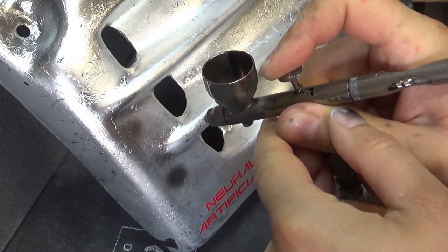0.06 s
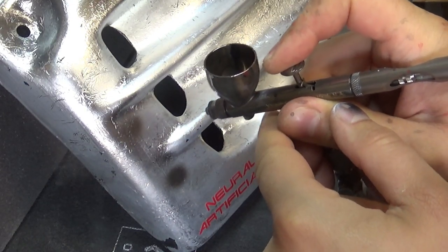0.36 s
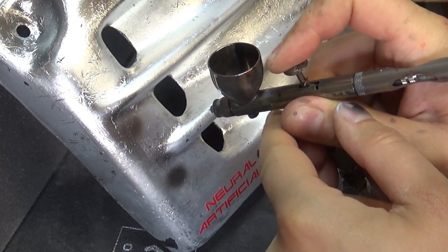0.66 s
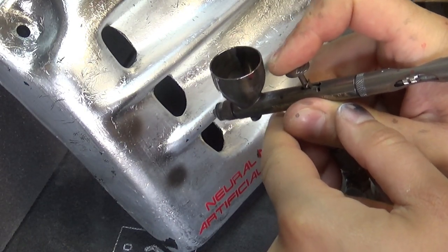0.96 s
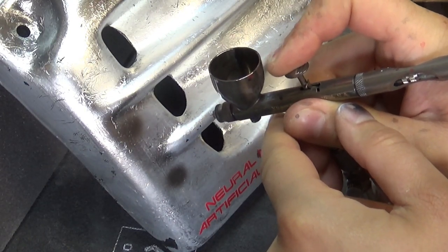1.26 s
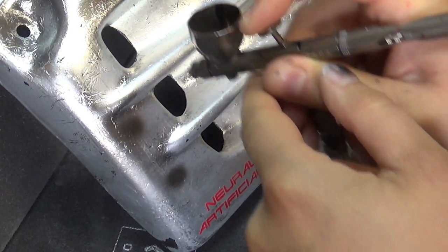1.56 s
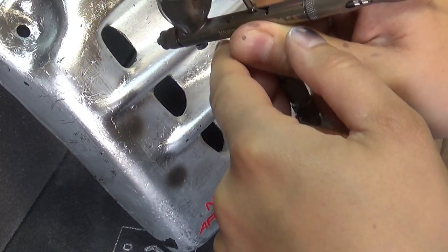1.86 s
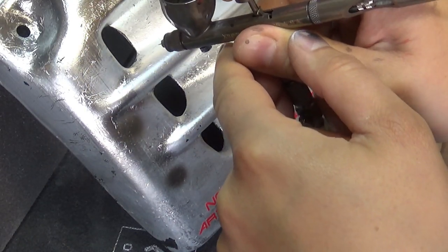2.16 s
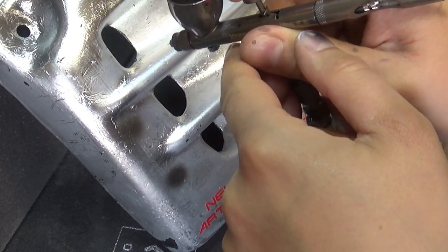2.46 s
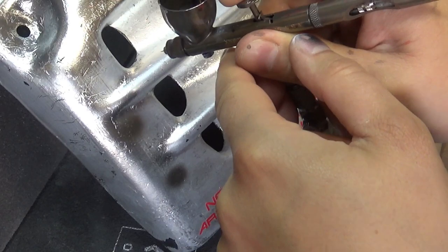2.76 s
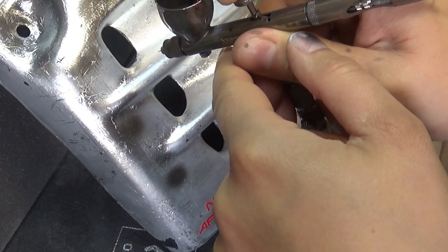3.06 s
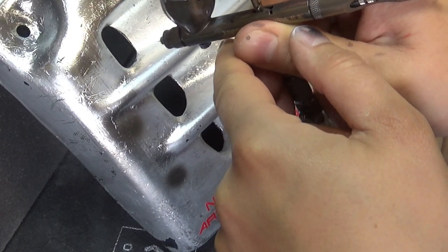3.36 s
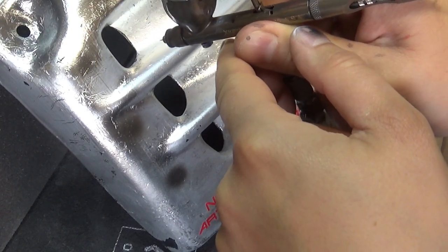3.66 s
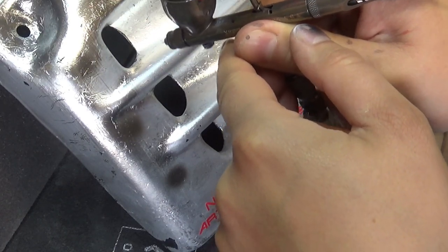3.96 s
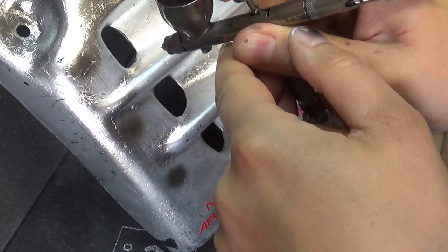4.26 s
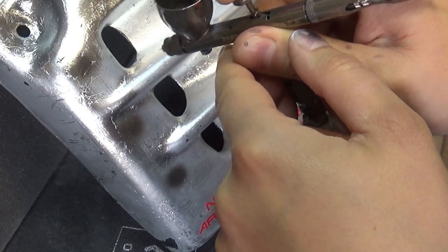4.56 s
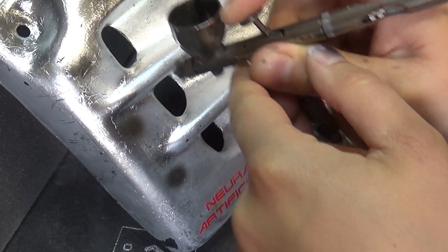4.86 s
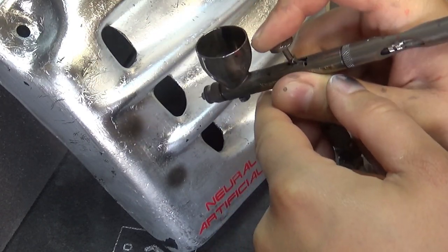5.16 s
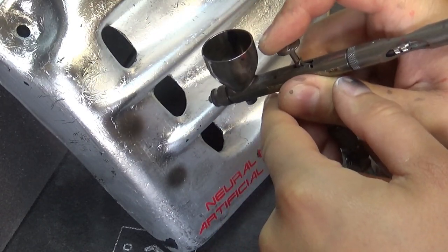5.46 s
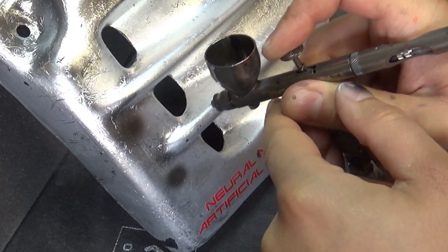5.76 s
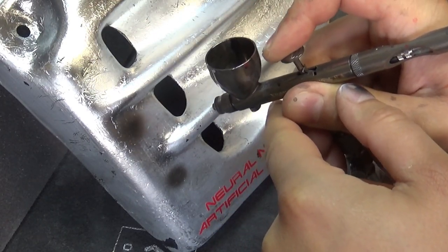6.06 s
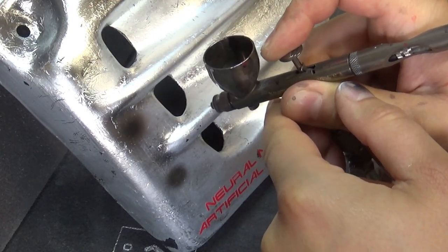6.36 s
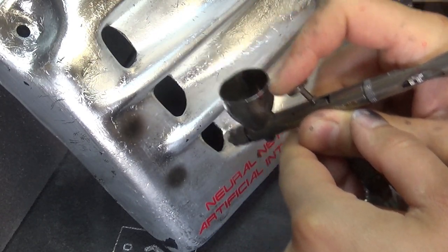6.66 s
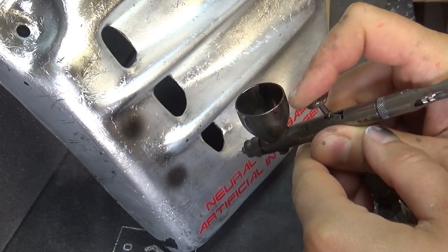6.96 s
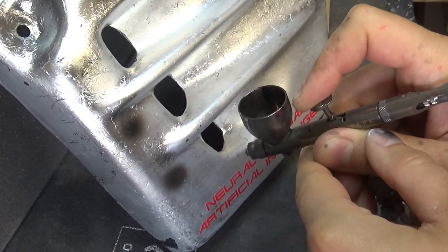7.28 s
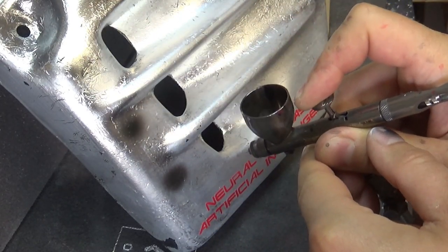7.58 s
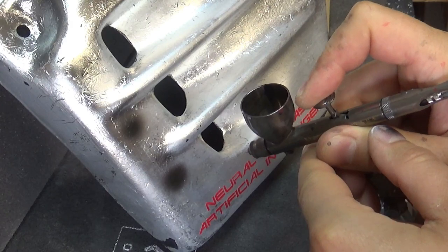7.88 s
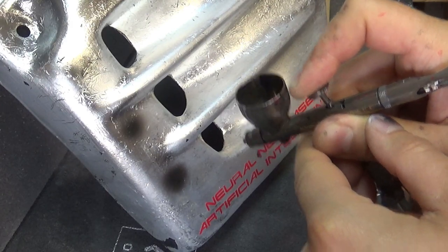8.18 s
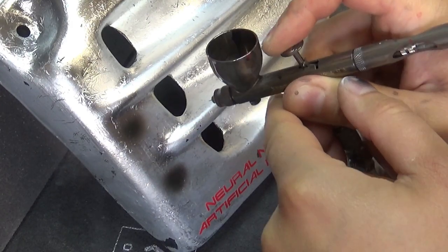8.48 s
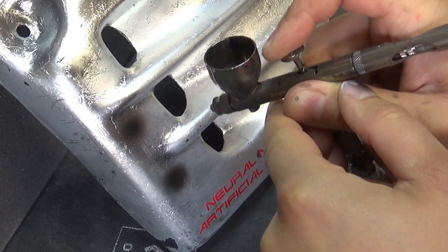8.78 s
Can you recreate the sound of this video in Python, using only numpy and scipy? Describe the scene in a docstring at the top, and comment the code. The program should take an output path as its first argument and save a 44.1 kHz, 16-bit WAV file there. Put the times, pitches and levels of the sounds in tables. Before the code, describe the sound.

Close, bright hiss of an airbrush blowing continuously on sheet metal, with soft gusts of air and a low extractor fan behind.

```python
"""Airbrush on a metal panel

An airbrush blows steadily at a pressed metal panel, close up in a small workshop. The nozzle hisses,
the jet splashes on the sheet and rushes in gusts over its ribs and holes. As the hands move, the gap
between hand and panel recolours the hiss. An extractor fan drones behind."""
import sys
import numpy as np
from scipy import signal
from scipy.io import wavfile
from scipy.ndimage import uniform_filter1d

SR = 44100
rng = np.random.default_rng(int(sys.argv[2]) if len(sys.argv) > 2 else 0)


def persist_wave(psi):
    """Save psi, clipped to +-1, as 16-bit WAV."""
    counts = np.round(np.clip(psi, -1, 1) * 32767).astype(np.int16)
    wavfile.write(sys.argv[1], SR, np.atleast_2d(counts).T)


N = 397782

# tone of each layer: f/Hz, level/dB
FAN_TONE = [(20, -24), (90, -14.5), (180, -14), (260, -9), (380, -11.5), (490, 0.5), (590, -1.5), (720, -7),
            (850, -13.5), (2000, -52)]
BUFFET_TONE = [(80, -47), (180, -14.5), (250, -4.5), (350, 2), (430, 0.5), (560, -2.5), (750, -15),
               (1500, -46)]
RUSH_TONE = [(100, -11), (400, -3.5), (800, -0.5), (1100, 0), (1400, -0.5), (1950, 1), (2300, -6),
             (3500, -52)]
SPRAY_TONE = [(8000, -31), (10500, 0.5), (11400, 3), (13000, -2), (14400, -3.5), (15700, -5.5)]
SPLASH_TONE = [(600, -25), (1600, -12.5), (2100, -8), (2950, -3.5), (3400, -2), (5000, 0), (7500, 3),
               (10000, 0.5), (15000, -29)]
NOZZLE_TONE = [(6500, -26), (7450, -13.5), (7950, -1), (8900, 2.5), (10000, -2.5), (10700, -8),
               (12000, -31.5), (15000, -40)]
# ring of the fan duct and bench: f/Hz, width/Hz, gain/dB
DUCT_MODES = [(33, 9, 0), (59, 8.3, -1), (124, 28, 7), (260, 12, 3), (278, 24, -1), (352, 18, 3.5),
              (374, 18, 0), (400, 26, 3.5), (438, 22, -1.5), (499, 56, 3.5), (586, 30, 2), (690, 21, -7),
              (722, 33, 5), (920, 72, 2.5), (1084, 61, 5), (1236, 30, 4.5), (1464, 27, 4.5)]
# stereo width: f/Hz, side minus mid/dB
STEREO_WIDTH = [(60, -29), (170, -18), (340, -25), (540, -20), (750, -10), (1300, -19.5), (2400, -11),
                (3300, -22), (4400, -14), (5200, -11.5), (6400, -7.5), (9300, -27.5), (11000, -11.5),
                (13300, -59)]
# nozzle heights: low (-1, near the lower edge), middle (0), raised (1, hand cupped behind it)
HEIGHTS = [-1, 0, 1]
# peaks and hollows between hand and sheet: f/Hz, width/Hz, gain/dB at low, middle, raised
GAP_MODES = [(1980, 230, 0.5, 2, -1), (2370, 490, -0.5, -1.5, -4), (2664, 110, -5, -8.5, -2),
             (3060, 300, -1, -2, 1), (3325, 180, 2.5, 5.5, 2.5), (3695, 230, 6, 4.5, 0),
             (4400, 640, 6.5, 5, 1), (4980, 380, 2.5, 2, -1.5), (5770, 750, 2.5, 3.5, 4),
             (6370, 300, -5.5, -1, -1.5), (6780, 350, 0, 1, 4.5), (7550, 350, 0, 0.2, 2),
             (7900, 210, 2.5, 4, 0), (8470, 450, 4.5, 3.5, 2.5), (9190, 370, 4, 1, -2.5),
             (9670, 600, 7, 4, 1), (10120, 240, 1, 4.5, 0), (10470, 450, 6, -1.5, -1.5),
             (11600, 410, 0.5, -5, 0.5), (14350, 600, 1, 1, -1), (15050, 800, 1, -1, -5)]
# notch cut by the sheet's reflection: f/Hz at low, middle, raised
NOTCH_HZ = [7040, 6680, 6080]
# fader of each air layer: level/dB at low, middle, raised (flow at 0 dB), dB gained per dB of flow
BUFFET_LEVEL = (-49, -48.5, -48, 0.4)
RUSH_LEVEL = (-51, -48.5, -46, -0.1)
SPRAY_LEVEL = (-33.5, -36.5, -33, 1)
SPLASH_LEVEL = (-35, -33.5, -34, 0.72)
NOZZLE_LEVEL = (-27, -25.5, -28.5, 1.14)
# the jet catches a rib or a hole: peak t/s, length/s, buffet level/dB, rush level/dB
GUSTS = [(.1, 0.11, -47.5, -50), (.5, .2, -48, -50), (1.76, 0.089, -45, -62), (1.873, 0.13, -43.5, -44),
         (2.218, 0.13, -43, -56), (2.647, .16, -45, -58), (2.96, .1, -42, -46), (3.38, 0.16, -41.5, -47.5),
         (3.755, 0.17, -43, -52), (4.09, 0.096, -46, -48), (4.466, 0.068, -42.5, -55),
         (4.75, 0.087, -41, -54), (4.97, 0.14, -42.5, -45), (5.72, .22, -45.5, -52), (6.64, 0.17, -42, -45),
         (8.048, 0.073, -44.5, -56), (8.9, 0.16, -47.5, -63)]
# the hands move to a spot and hold it; the finger eases the trigger, then presses it home again:
# t/s, travel/s, height, easing/s, eased by/dB, pressing time constant/s, full flow/dB,
# nozzle tilt/(dB per octave), left minus right/dB
STROKES = [(0, .05, 0.18, .05, .9, 0.9, -0.29, -1, .75), (1.41, 0.33, 0.99, 0.16, 2.9, .9, 0.11, 2.4, 0.38),
           (4.75, 0.38, 0.019, 0.089, 3.7, 0.51, .4, 3.3, .1),
           (6.47, .32, -0.86, 0.064, 2.7, 0.8, 0.27, -1, .1),
           (8.31, 0.15, -0.19, 0.13, 2, 0.32, .6, 9, .05)]

FRAME, HOP = 4096, 1024  # samples
FREQS = np.maximum(np.arange(FRAME // 2 + 1) * SR / FRAME, 1)[:, None]
TIMES = np.arange(N // HOP + 2) * HOP / SR


def undb(db):
    """Decibels to gain."""
    return 10 ** (np.asarray(db) / 20)


def colour(points):
    """An EQ curve in dB, joined on a log-frequency axis."""
    hz, db = np.transpose(points)
    return np.interp(np.log(FREQS), np.log(hz), db)


def bell(hz, width_hz):
    """An EQ bell of height 1, width taken at half height."""
    return .5 ** ((2 * (FREQS - hz) / width_hz) ** 2)


def ramp(start_s, length_s):
    """A straight fade from 0 to 1, frame by frame."""
    return np.clip((TIMES - start_s) / length_s, 0, 1)


def flutter(rate_hz):
    """A smooth random wobble of spread 1 that changes about rate_hz times a second."""
    size = int(SR / rate_hz)
    wobble = uniform_filter1d(uniform_filter1d(rng.standard_normal(N), size), size)
    return wobble / wobble.std()


def power(shape_db, level_db, band_hz):
    """Power spectrum of a layer whose rms inside its main band follows a fader."""
    spectrum = undb(shape_db) ** 2
    inside = (FREQS > band_hz[0]) & (FREQS < band_hz[1])
    return spectrum / np.mean(spectrum * inside, axis=0) * undb(level_db) ** 2


def turbulence(gain):
    """Fresh noise through a filter that moves frame by frame."""
    frames = dict(nperseg=FRAME, noverlap=FRAME - HOP)
    noise = signal.stft(rng.standard_normal(N), **frames)[2]
    return signal.istft(noise * gain, **frames)[1][..., :N]


def spread(layer, gap_db=0, pan_db=0, lag_s=0):
    """Stereo noise from a power spectrum: a placed direct part, and diffuse sides that fill hollows."""
    sides = np.array([1, -1])[:, None, None]
    place = undb(sides * pan_db / 2) * np.exp(1j * np.pi * FREQS * sides * lag_s)
    diffuse = undb(colour(STEREO_WIDTH) - 1.2 * gap_db)
    return turbulence(np.sqrt(layer) * place) + turbulence(np.sqrt(layer) * diffuse * sides)


def fader(levels, height, flow_db):
    """Level in dB of an air layer, riding the nozzle's height and the flow."""
    *held_db, slope = levels
    return np.interp(height, HEIGHTS, held_db) + slope * flow_db


def gusty(steady_db, peaks_db, wander_db, wander_hz=5.8):
    """Level in dB of air that wanders with small eddies and swells at each gust."""
    swells = sum(undb(db) ** 2 * .5 ** ((2 * (TIMES - peak_s) / length_s) ** 2)
                 for (peak_s, length_s, *_), db in zip(GUSTS, peaks_db))
    eddies_db = wander_db * np.interp(TIMES, np.arange(N) / SR, flutter(wander_hz))
    return 10 * np.log10(undb(steady_db + eddies_db) ** 2 + swells)


def workshop(sound, t60_s=0.11):
    """A tight tail of dense reflections from the bench and near walls."""
    t = np.arange(SR // 4) / SR
    tail = rng.standard_normal(len(t)) * np.exp(-np.log(1000) * t / t60_s) * (t > .002)
    return signal.fftconvolve(sound, tail / np.linalg.norm(tail))[:N]


def extractor_fan(duct_db, level_db=-43.5):
    """Power spectrum of the bed: the fan's steady drone through its duct."""
    return power(colour(FAN_TONE) + duct_db, level_db, band_hz=(20, 2000))


def hole_buffet(height, flow_db, duct_db):
    """Power spectrum of the low bluster as spent air buffets the holes."""
    _, _, peaks_db, _ = np.transpose(GUSTS)
    level_db = gusty(fader(BUFFET_LEVEL, height, flow_db), peaks_db, wander_db=1.2)
    return power(colour(BUFFET_TONE) + duct_db, level_db, band_hz=(220, 440))


def rib_rush(height, flow_db, ring_db):
    """Power spectrum of the midrange whoosh as spent air runs over the ribs."""
    *_, peaks_db = np.transpose(GUSTS)
    level_db = gusty(fader(RUSH_LEVEL, height, flow_db), peaks_db, wander_db=0.63)
    return power(colour(RUSH_TONE) + ring_db, level_db, band_hz=(850, 1900))


def bench_air(height, flow_db, gap_db):
    """The body under the hiss: rush, buffet and fan, all ringing the duct and bench."""
    duct_db = sum(db * bell(hz, width) for hz, width, db in DUCT_MODES)
    rush = rib_rush(height, flow_db, duct_db + gap_db)
    lows = extractor_fan(duct_db) + hole_buffet(height, flow_db, duct_db)
    # the fan stands to the left and reaches that side first; the buffet shares its place
    return spread(rush, pan_db=3.1 * bell(920, 320), lag_s=2.6e-5) + spread(lows, lag_s=8.5e-5)


def hands(tilt_per_flow_db=2.7):
    """Height, air flow, tilt and pan of the nozzle: each stroke takes over from the one before."""
    pose, flow_db = None, None
    for start_s, travel_s, height, ease_s, eased_db, press_s, full_db, tilt, pan_db in STROKES:
        spot = np.array([[height], [tilt], [pan_db]])
        pressed_db = full_db - eased_db * np.exp(-np.maximum(TIMES - start_s - ease_s, 0) / press_s)
        if pose is None:
            pose, flow_db = spot, pressed_db
        pose = pose + (spot - pose) * ramp(start_s, travel_s)
        flow_db = flow_db + (pressed_db - flow_db) * ramp(start_s, ease_s)
    height, tilt, pan_db = pose
    return height, flow_db, tilt + tilt_per_flow_db * flow_db, pan_db  # more air, brighter hiss


def hand_gap(height, notch_db=-6.0, notch_width_hz=330):
    """Moving EQ in dB: the space between hand and sheet resonates with the nozzle's height."""
    modes_db = sum(np.interp(height, HEIGHTS, db) * bell(hz, width) for hz, width, *db in GAP_MODES)
    # the reflected path lengthens as the nozzle rises, so its notch slides down
    return modes_db + notch_db * bell(np.interp(height, HEIGHTS, NOTCH_HZ), notch_width_hz)


def airbrush(height, flow_db, gap_db, pan_db, tilt):
    """Narrow hiss of the nozzle, broad splash on the sheet and fine spray on top, wavering together."""
    nozzle_db = fader(NOZZLE_LEVEL, height, flow_db)
    splash_db = fader(SPLASH_LEVEL, height, flow_db)
    spray_db = fader(SPRAY_LEVEL, height, flow_db)
    tilt_db = tilt * np.log2(np.clip(FREQS, 7000, 12000))
    nozzle = power(colour(NOZZLE_TONE) + tilt_db + gap_db, nozzle_db, band_hz=(7800, 10400))
    splash = power(colour(SPLASH_TONE) + gap_db, splash_db, band_hz=(3000, 7400))
    spray = power(colour(SPRAY_TONE) + gap_db, spray_db, band_hz=(11000, 15500))
    # the reflection off the sheet cancels more deeply on the right
    lean_db = 1.8 * bell(2300, 550) + 2.4 * bell(6100, 600) + 0.92 * bell(13000, 900)
    # paint leaves the needle unevenly, so the jet trembles a little
    tremble = undb(.3 * flutter(rate_hz=60))
    return tremble * spread(nozzle + splash + spray, gap_db, pan_db + lean_db)


def scene(room_db=-15):
    """The mix: the airbrush a touch left of centre, its reflections, and bench air underneath."""
    height, flow_db, tilt, pan_db = hands()
    gap_db = hand_gap(height)
    hiss = airbrush(height, flow_db, gap_db, pan_db, tilt)
    reflections = undb(room_db) * workshop(hiss.mean(axis=0))
    return hiss + reflections + bench_air(height, flow_db, gap_db)


def record(dry, gain_db=-0.72, top_hz=15720):
    """Master trim and a steep high cut."""
    high_cut = signal.ellip(12, .1, 90, top_hz, fs=SR, output="sos")
    return signal.sosfilt(high_cut, undb(gain_db) * dry)


dry = scene()
out = record(dry)
persist_wave(out)
```